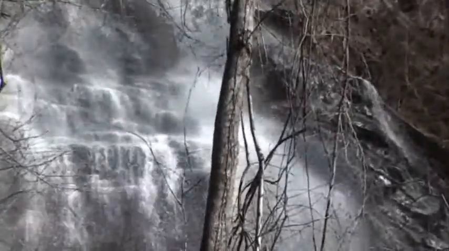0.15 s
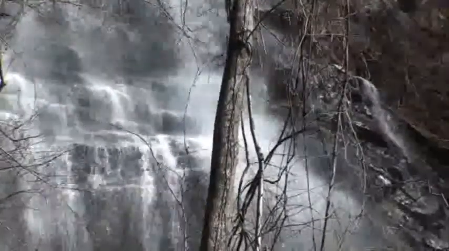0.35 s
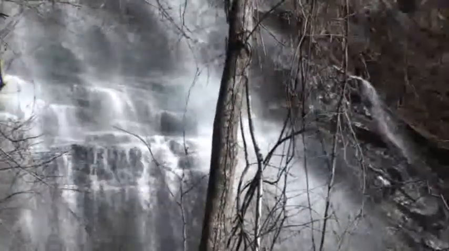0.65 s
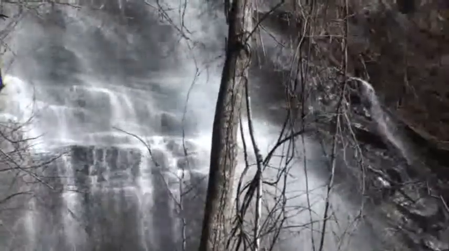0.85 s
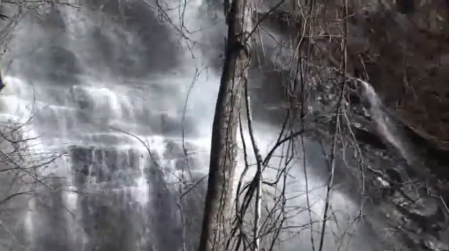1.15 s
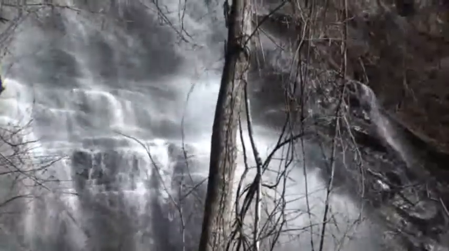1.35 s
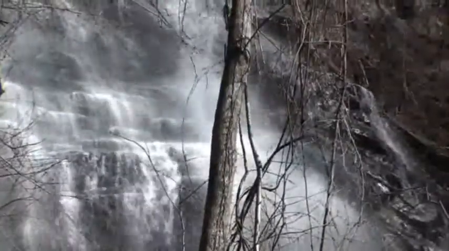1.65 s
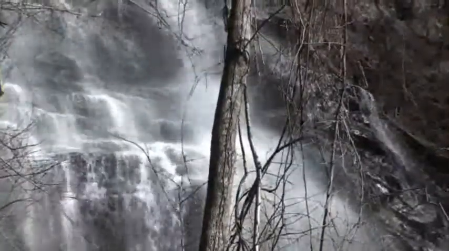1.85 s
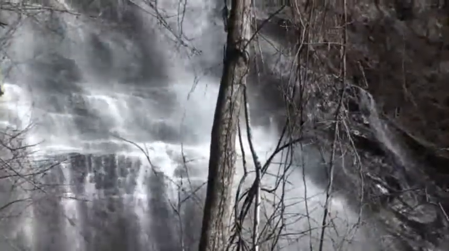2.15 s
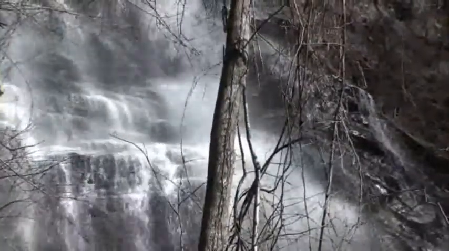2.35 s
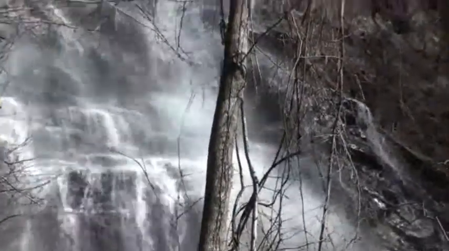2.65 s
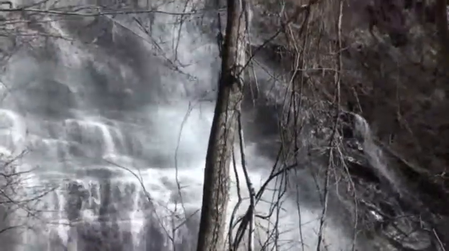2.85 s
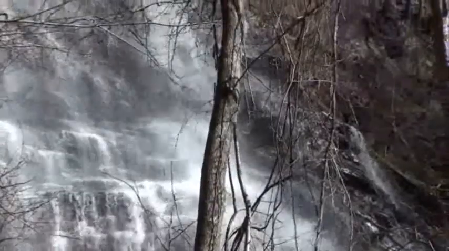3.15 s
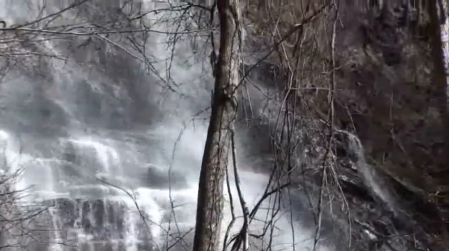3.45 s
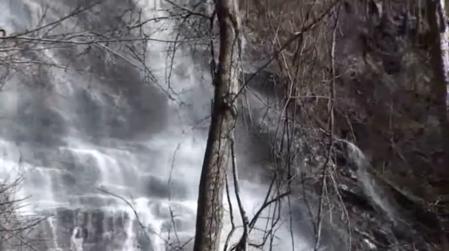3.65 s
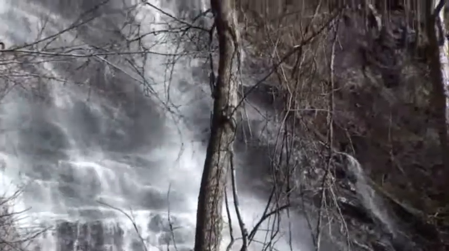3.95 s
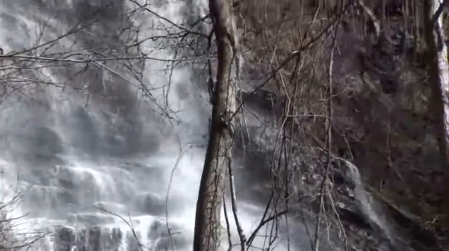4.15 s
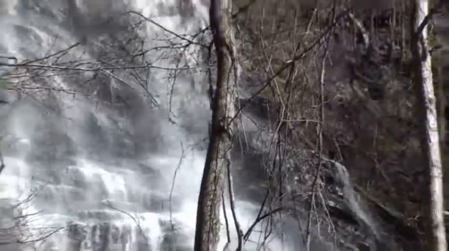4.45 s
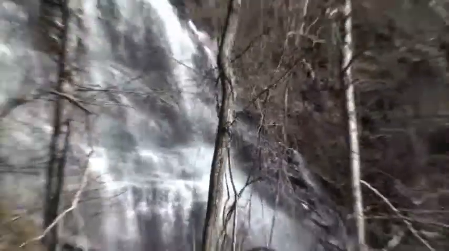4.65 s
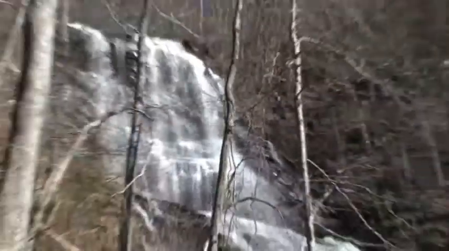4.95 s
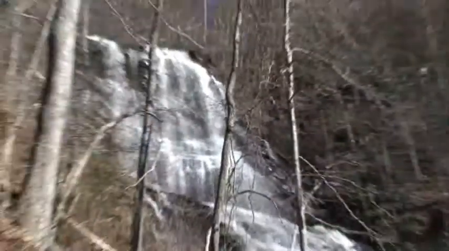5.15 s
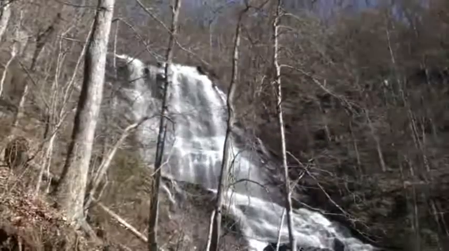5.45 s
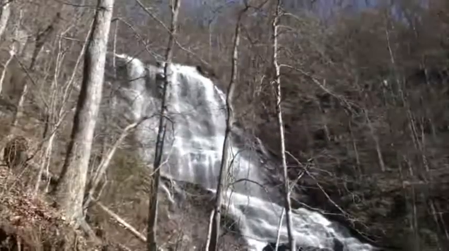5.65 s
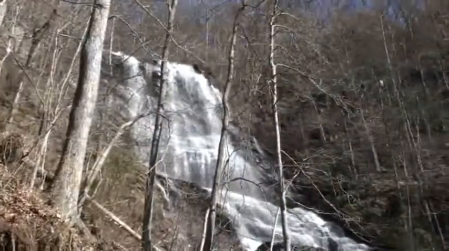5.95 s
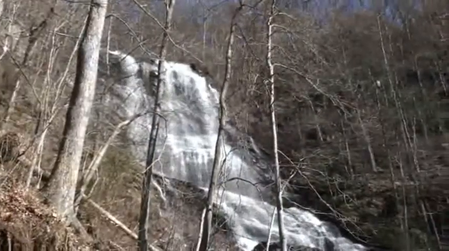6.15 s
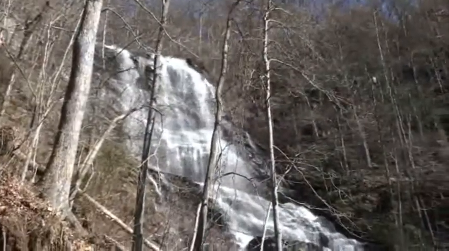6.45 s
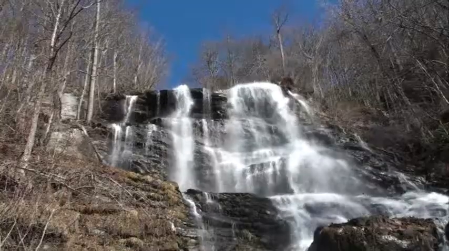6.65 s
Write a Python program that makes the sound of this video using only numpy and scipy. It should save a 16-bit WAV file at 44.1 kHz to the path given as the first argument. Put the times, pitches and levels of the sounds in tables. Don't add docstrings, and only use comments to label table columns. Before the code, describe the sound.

Continuous outdoor roar of heavy falling water, with no separate splashes, only slight surges in the spray hiss. It starts loud, centred and full in the midrange, with faint compressed camera-microphone grit. After about five seconds it sinks to a softer, wider, rumbling wash. A tiny gap follows, then the fall returns with stronger bass and a slight rightward lean.

```python
import sys
import numpy as np
from scipy import signal
from scipy.fft import rfft, irfft, next_fast_len
from scipy.io import wavfile
from scipy.ndimage import uniform_filter1d

SR = 44100
rng = np.random.default_rng(int(sys.argv[2]) if len(sys.argv) > 2 else 0)


def ratio_of_db(decibels):
    return 10 ** (np.asarray(decibels, float) / 20)


def transcribe(u):
    v = np.clip(np.atleast_2d(u).T, -1, 1)
    q = np.round(v * 32767).astype(np.int16)
    wavfile.write(sys.argv[1], SR, q)


N = 300321

CUT_S = 6.628
BANDS_HZ = 25 * 2 ** np.arange(0, 9.6, 1 / 2)

# f/Hz, wide level/dB, near standpoint level/dB
VIEW_COLOUR = [(30, 5, 2), (70, 2, 8), (140, -2.5, 2.5), (280, -6.5, 1), (600, -9, -4), (1200, -8, -6.5),
               (2500, -8.5, -4), (5000, -8.5, -5), (8950, -7.5, -1), (13000, -9.5, -4)]
# f/Hz, zoomed-in level/dB, wide level/dB, near level/dB
FLANK_LEVELS = [(40, -31, -14, -11), (111, -23.5, -20.5, -19), (200, -15.5, -18, -20), (398, -19, -14, -11),
                (690, -15, -9.5, -8), (1280, -13, -7.5, -6), (2500, -13.5, -5.5, -5), (7900, -5.5, -10, -7),
                (13000, 5, 0, -1)]


def waterfall(surge_db=0.57, gust_db=0.2, flicker_db=0.08):
    wide = zoom(np.arange(N) / SR)
    near = np.arange(N) > CUT_S * SR
    low_db, hiss_db = flow()
    surge = surge_db * walk(9) + gust_db * walk(24.91)
    ahead, flanks = 0, 0
    for hz, front, side in zip(BANDS_HZ, roar_bands(), roar_bands()):
        spray = np.clip(np.log2(hz / 500) / 3, 0, 1)
        wide_db, near_db = at_hz(VIEW_COLOUR, hz)
        view_db = np.where(near, near_db, wide * wide_db)
        flow_db = low_db + spray * (hiss_db - low_db)
        db = view_db + flow_db + spray * (surge + flicker_db * walk(11))
        close_db, open_db, near_side_db = at_hz(FLANK_LEVELS, hz)
        side_db = np.where(near, near_side_db, close_db + wide * (open_db - close_db))
        ahead = ahead + ratio_of_db(db) * front
        flanks = flanks + ratio_of_db(db + side_db) * side
    close_lean, wide_lean, near_lean = 0.036, 0.083, 0.24
    lean = np.where(near, near_lean, close_lean + wide * (wide_lean - close_lean))
    return ahead, flanks - lean * ahead


# f/Hz, level/dB per Hz
FALL_SPECTRUM = [(18, -45), (30, -37), (65, -18), (120, -10.5), (217, -5), (345, -2.5), (766, -1),
                 (1570, -2.5), (3300, -7.5), (6990, -12.5), (9770, -18), (11400, -17.5), (12600, -20),
                 (15500, -31)]


def roar_bands(roar_db=-18.5):
    size = next_fast_len(N)
    hz = np.maximum(np.arange(size // 2 + 1) * SR / size, 1)
    spectrum = rfft(rng.standard_normal(size)) * ratio_of_db(at_hz(FALL_SPECTRUM, hz)[0])
    spectrum *= ratio_of_db(roar_db) * size / np.sqrt(2 * np.sum(np.abs(spectrum) ** 2))
    place = np.interp(np.log(hz), np.log(BANDS_HZ), np.arange(len(BANDS_HZ)))
    for k in range(len(BANDS_HZ)):
        overlap = np.clip(1 - np.abs(place - k), 0, 1)
        yield irfft(spectrum * overlap, size)[:N]


def flow():
    low_db, low_heave_db = 1.44, .45
    hiss_db, hiss_heave_db = 0.67, .12
    heaves_per_s = 6
    swell_db, crest_s, swell_from_db = 6, .045, -3
    s = np.arange(N) / SR
    close = 1 - zoom(s)
    since = np.maximum(s - CUT_S, 0) / crest_s
    swell = swell_db * since * np.exp(1 - since) + (s > CUT_S) * swell_from_db * np.exp(-since)
    low = close * low_db + low_heave_db * walk(heaves_per_s) + swell / 2
    return low, close * hiss_db + hiss_heave_db * walk(heaves_per_s)


def walk(rate):
    k = int(SR / rate)
    held = np.repeat(rng.standard_normal(N // k + 1), k)
    return 0.99 * uniform_filter1d(uniform_filter1d(held, k), k)[:N]


def zoom(s):
    rest, start_s, length_s = 0.12, 4.73, 0.81
    pull = np.clip((s - start_s) / length_s, 0, 1)
    return rest + (1 - rest) * pull ** 2 * (3 - 2 * pull)


def at_hz(table, hz):
    f, *columns = np.transpose(table)
    return [np.interp(np.log(hz), np.log(f), c) for c in columns]


# f/Hz, full thrift level/dB, no thrift level/dB
SURVIVAL_BAR = [(30, 3, -2), (150, 4, -1), (300, 4, -1), (700, 3, -2), (1250, 4, -2), (1400, 8.3, -1),
                (9500, 8.4, 0), (10500, 7, 1), (11400, 7, 2), (11700, 10, 6.5), (13300, 12, 9)]


def camcorder_thinning(mid, side):
    frame, grid = 2048, 440
    shift = frame - grid
    window = np.sin(np.pi * (np.arange(2 * frame) + .5) / (2 * frame))
    padded = np.pad([mid, side], ((0, 0), (shift, 0)))
    hz, s, (m, d) = signal.stft(padded, SR, window, 2 * frame, frame)
    s = s - shift / SR
    wide, thrift = zoom(s), starving(s, hz)

    close_hz, wide_hz, near_hz, wander_hz, ragged_hz = 13300, 12850, 13250, 70, 240
    opened_hz = close_hz + np.clip(2 * wide - 1, 0, 1) * (wide_hz - close_hz)
    top_hz = np.where(s > CUT_S, near_hz, opened_hz)
    ragged = rng.standard_normal((frame // 4 + 1, len(s)))
    ragged = np.repeat(ragged, repeats=4, axis=0)[:len(hz)]
    limit_hz = top_hz + wander_hz * rng.standard_normal(len(s)) + ragged_hz * ragged
    keep_mid = 1. * (hz[:, None] < limit_hz)
    for t, f in blips():
        keep_mid[np.abs(hz - f) < 20, np.argmin(np.abs(s - t))] = ratio_of_db(5)

    tight_db, loose_db = (c[:, None] for c in at_hz(SURVIVAL_BAR, np.maximum(hz, 1)))
    bar_db = loose_db + thrift * (tight_db - loose_db) + .5 * rng.standard_normal(len(s))
    power = uniform_filter1d(np.abs(d) ** 2, size=61, axis=0)
    usual = np.sqrt(uniform_filter1d(power, size=3, axis=1))
    keep_side = np.abs(d) > usual * ratio_of_db(bar_db)

    kept = np.array([m * keep_mid, d * keep_side])
    thinned = signal.istft(kept, SR, window, 2 * frame, frame)[1][:, shift:shift + N]
    return thinned[0], thinned[1] + patches(side)


# middle t/s, length t/s, thrift (0-1, may exceed 1)
THRIFT_SPELLS = [
    (5.56, .27, 1.2),
    (5.955, .12, 1.05),
    (6.24, .11, 1.2),
    (6.51, .04, .5),
]


def starving(s, hz):
    begins, complete = .15, .78
    ramp_s = .045
    spared_hz, spared_share = 3800, .72
    spells = 0
    for t, length, depth in THRIFT_SPELLS:
        spells = spells + depth * np.clip((length / 2 - np.abs(s - t)) / ramp_s + .5, 0, 1)
    zoomed_in = np.sqrt(np.clip((complete - zoom(s)) / (complete - begins), 0, 1))
    return zoomed_in + spells * np.where(hz < spared_hz, spared_share, 1)[:, None]


def blips():
    count, top_share = 20, .35
    (from_s, to_s), (low_hz, top_hz) = (1, 5.25), (13900, 15260)
    when, where = rng.random((count, 2)).T
    height = np.minimum(where / (1 - top_share), 1)
    return zip(from_s + when * (to_s - from_s), low_hz + (top_hz - low_hz) * height)


# t/s, centre f/Hz
FLANK_PATCHES = [(.2, 7600), (.22, 10000), (1.75, 6000), (1.75, 10300), (1.75, 12500), (1.82, 5800),
                 (1.82, 11000), (1.87, 4900), (1.87, 6300), (1.87, 10300), (1.87, 12500), (2.5, 4700),
                 (2.5, 10300), (2.85, 1800), (3.15, 9000), (3.45, 4700), (3.61, 9000), (4.42, 5000)]


def patches(side, length_s=.04, width_hz=1300):
    out, size = np.zeros(N), int(length_s * SR)
    hz = np.arange(size // 2 + 1) * SR / size
    for t, centre in FLANK_PATCHES:
        start = int(t * SR) - size // 2
        span = slice(start, start + size)
        band = np.abs(hz - centre) < width_hz / 2
        out[span] += np.hanning(size) * irfft(rfft(side[span]) * band, size)
    return out


def mute():
    start_s, hold_s, floor, fade_in_s = 6.6244, .0068, ratio_of_db(-20), .006
    s = np.arange(N) / SR - start_s
    back = 1 - np.exp(-np.maximum(s - hold_s, 0) / fade_in_s)
    return np.where(s < 0, 1, floor + (1 - floor) * back)


def scene():
    ahead, flanks = waterfall()
    return np.array([ahead + flanks, ahead - flanks])


def low_pass(x):
    return signal.sosfilt(signal.butter(12, 15290, fs=SR, output="sos"), x)


def record(dry):
    left, right = dry * mute()
    mid, side = camcorder_thinning((left + right) / 2, (left - right) / 2)
    return low_pass(np.array([mid + side, mid - side]))


dry = scene()
out = record(dry)
transcribe(out)
```